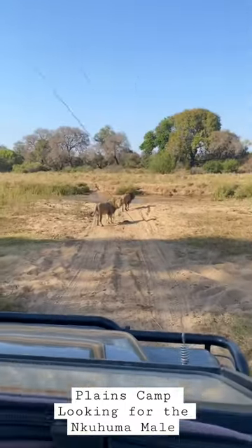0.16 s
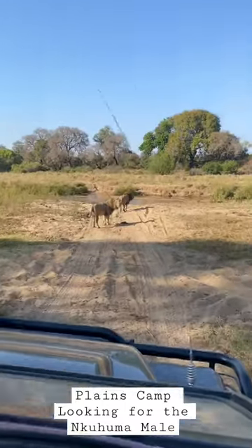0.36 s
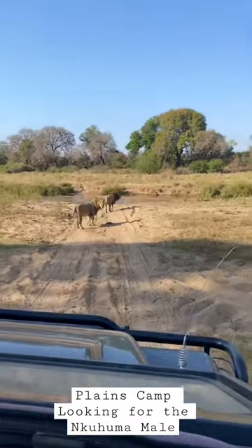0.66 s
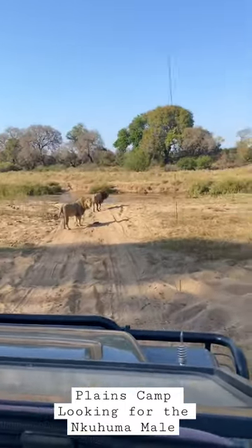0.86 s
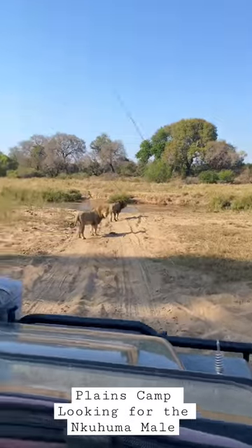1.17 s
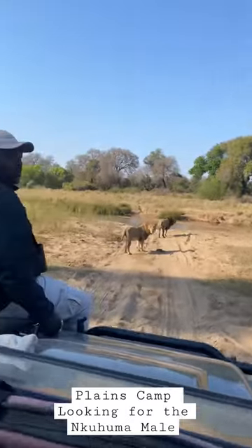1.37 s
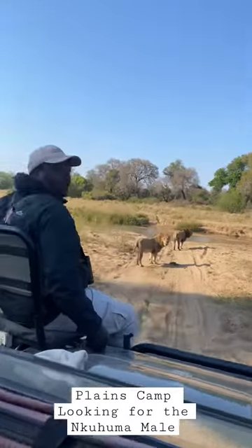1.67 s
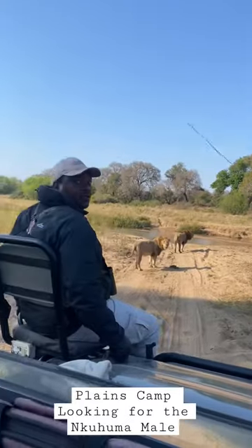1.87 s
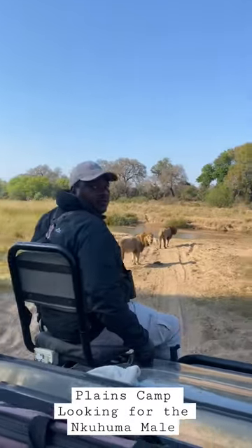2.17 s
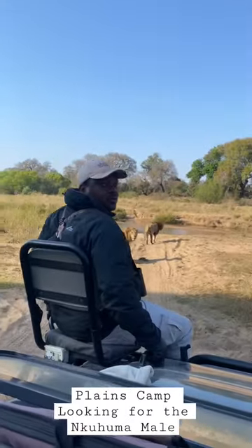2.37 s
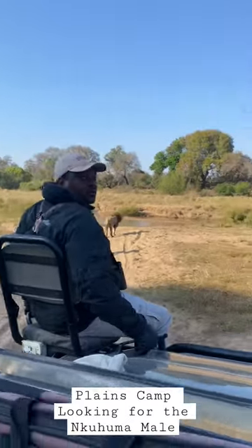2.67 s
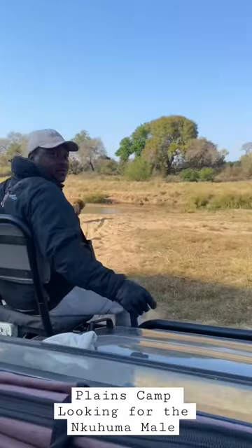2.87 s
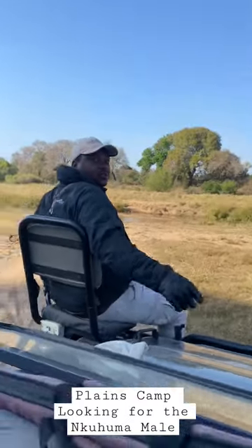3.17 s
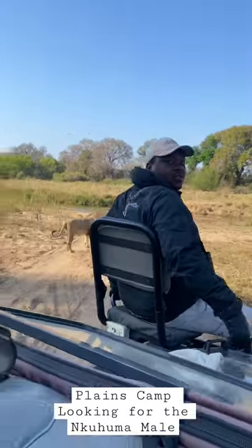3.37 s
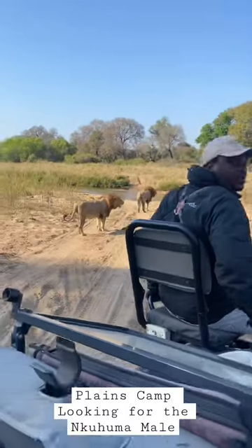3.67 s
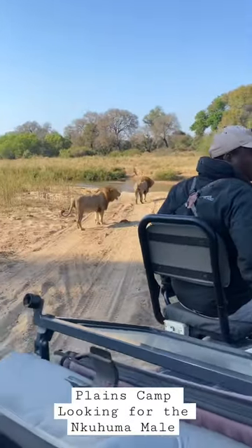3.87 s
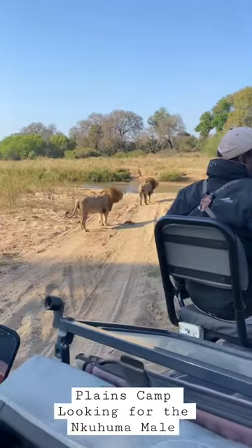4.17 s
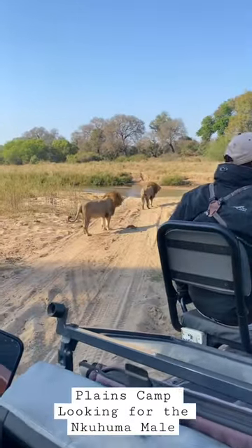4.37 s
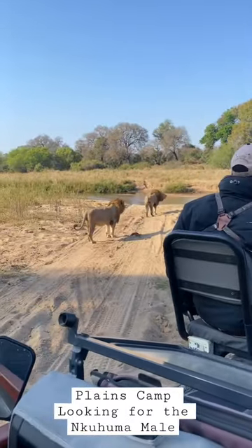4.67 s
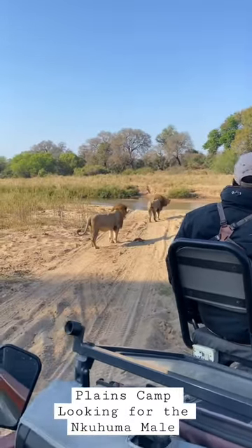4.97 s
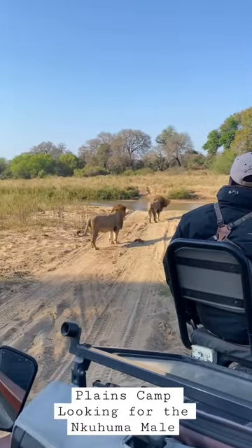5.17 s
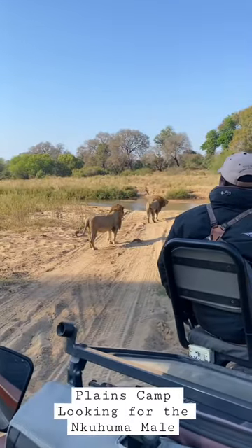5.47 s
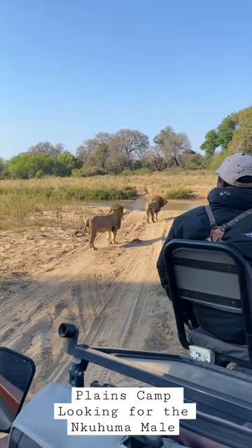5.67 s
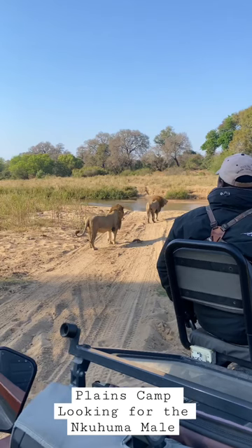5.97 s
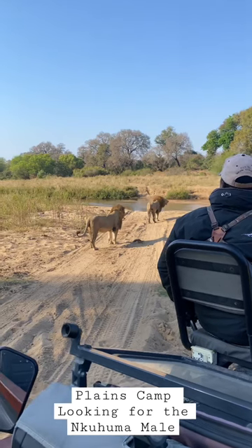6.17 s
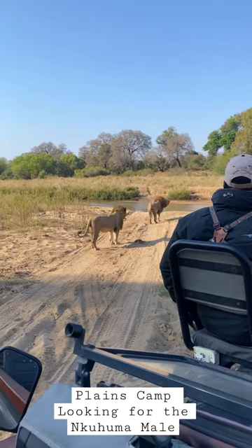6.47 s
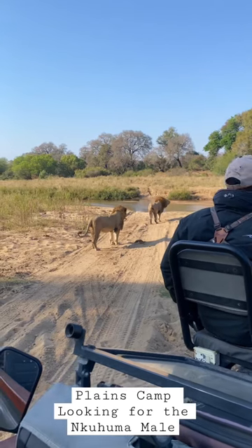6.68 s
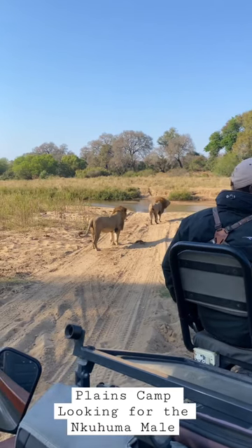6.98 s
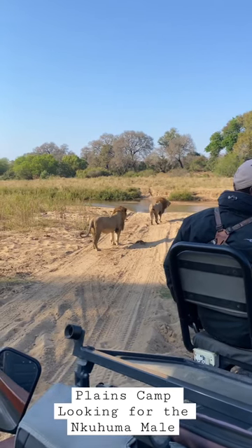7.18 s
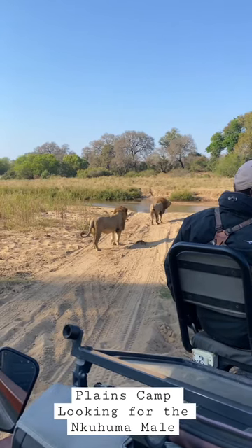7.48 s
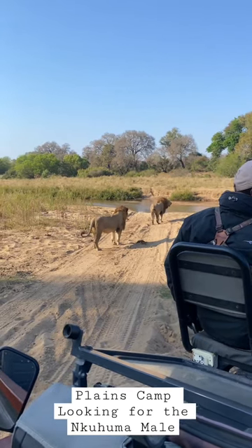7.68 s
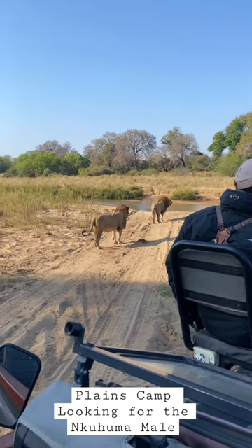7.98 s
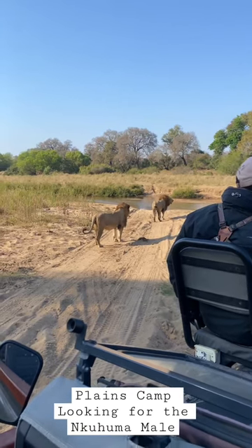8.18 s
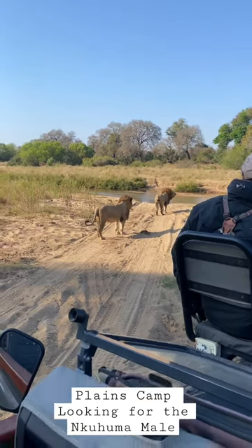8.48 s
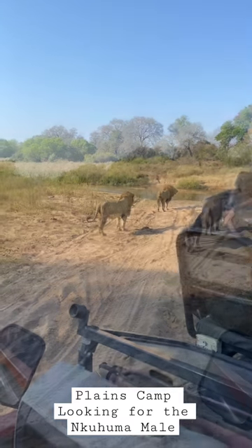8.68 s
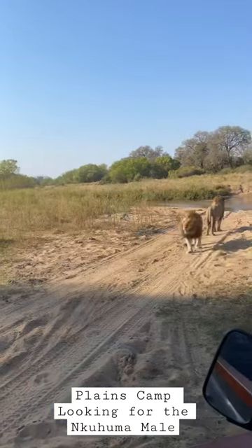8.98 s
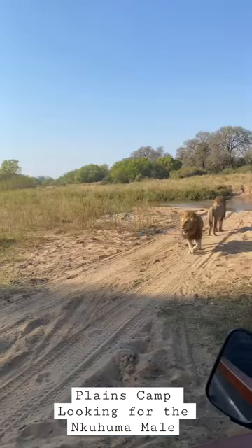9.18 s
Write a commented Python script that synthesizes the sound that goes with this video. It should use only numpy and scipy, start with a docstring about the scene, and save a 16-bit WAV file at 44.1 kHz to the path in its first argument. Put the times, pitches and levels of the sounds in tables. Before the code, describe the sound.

Microphone at the vehicle: low engine throb and quiet hush of open country under powerful, nearly pure low lion moans that rise and sink, breaking into gravelly growl. A companion moans faintly behind. Thin bird chirps slip between calls. Midway there are rattles, tiny squeaks and knocks; after the last short moan the engine speeds up over crunching sand, then vanishes, leaving hush, faint twitters and a few ticks.

```python
"""First a lion's deep moan, close to an idling vehicle in open bush; a second lion joins in, duller and weaker.
Moans come from a buzz and puffs of the vocal folds through moving resonances, torn at times into a rasp.
The microphone is at the vehicle: engine orders through bodywork, filtered-noise tyres and sand, ticking fittings,
dull bumps, scratchy squeaks. It pulls forward, then the sound of engine and tyres is quickly faded out.
Birds, made of gliding sines, chirp now and then and whistle at the end; trees scatter a faint tail."""
import sys
import numpy as np
from scipy import signal
from scipy.fft import rfft, irfft, next_fast_len
from scipy.io import wavfile
from scipy.ndimage import uniform_filter1d, map_coordinates

SR = 44100
rng = np.random.default_rng(int(sys.argv[2]) if len(sys.argv) > 2 else 0)


def master(y):
    """Save y as 16-bit WAV."""
    cut = np.clip(np.atleast_2d(y).T, -1, 1)
    pcm = np.round(cut * 32767)  # scale
    wavfile.write(sys.argv[1], SR, pcm.astype(np.int16))


N = 411453  # samples

# The place. Likeness of left and right: frequency_hz, likeness (-1 to 1)
STEREO_LIKENESS = [(60, 1), (250, 0.97), (640, .91), (1400, 0.78), (3100, 0.45), (6500, 0.4), (11000, -0.5)]
# Hush of the open country, shape only: frequency_hz, density_db (per Hz)
STILL_AIR = [(15, -29.5), (30, -3), (70, -2.5), (170, -7.5), (400, -15.5), (750, -16), (1500, -21),
             (2800, -24), (3800, -24), (5400, -27), (10500, -33.5), (12500, -37), (15000, -43)]
# Decay of the tree line's tail: frequency_hz, t60_s
BUSH_DECAY = [(100, 0.68), (500, 0.3), (2000, 0.19), (10000, 0.11)]
# Share of a roar that the trees throw back: frequency_hz, level_db
SCATTER = [(170, -24), (340, -12)]

# The engine's firing rate: time_s, firings_per_s
FIRING = [(0, 32.5), (2.1, 32.5), (2.45, 36.5), (3.1, 35), (3.9, 32.5), (6.1, 32.3), (6.85, 38.5),
          (7.05, 39.3), (7.7, 48), (8.05, 58), (8.55, 64.5)]
# Engine level before orders and combustion are mixed: time_s, level_db
ENGINE_LOAD = [(0, -39.5), (1.0, -33.5), (1.65, -41), (2.1, -30.5), (2.95, -28), (3.3, -36), (4.4, -41),
               (5.55, -42), (6.45, -41.5), (6.73, -27.5), (7.02, -44.5), (7.5, -38), (8.0, -40), (8.3, -30),
               (8.7, -34)]
# Noise of combustion, shape only: frequency_hz, level_db
COMBUSTION = [(20, -39), (31, -19.5), (43, -3), (62, 1), (90, -3), (135, -3.5), (200, -11), (270, -24),
              (350, -23.5), (600, -37.5), (2000, -67.5)]
# Bodywork resonances, shape only: frequency_hz, level_db
CABIN = [(20, -35), (33, -13.5), (42, -3), (48, 9), (56, -11), (66, 13), (82, -10), (100, -13), (145, -6),
         (215, -19), (270, -10), (330, -30), (500, -41)]
# Resonance of the booming panel, shape only: frequency_hz, level_db
PANEL = [(80, -42.5), (104, -4.5), (118, 1.5), (130, -12), (155, -14), (200, -62)]
# Booms of the panel: start_s, length_s, level_db
BOOMS = [(2.542, 0.78, -62), (3.76, 0.61, -36), (6.647, 0.69, -35), (7.773, 0.48, -29.5),
         (8.284, 0.56, -35)]
PANEL_HUM_DB = -57.5  # always there, booms add to it
FADE_S, FADE_DB_PER_S = 8.75, 307  # engine and tyres are faded out from here, this fast

# Ground under the tyres, before trims and wobbles: time_s, rolling_db, sand_db
GROUND = [(0, -50, -67.5), (1.2, -53, -70), (1.6, -56.5, -81.5), (2.6, -57.5, -63), (3.3, -41.5, -65),
          (3.9, -60.5, -79.5), (4.4, -58.5, -70), (5.7, -65, -69.5), (6.6, -52.5, -62.5), (7.1, -57.5, -67),
          (7.7, -54, -57.5), (8.1, -47, -53.5), (8.4, -48, -58.5), (8.67, -51, -56)]
# Rolling tyres, shape only: frequency_hz, density_db (per Hz)
ROLLING = [(150, -38.5), (220, 2.5), (280, 5.5), (345, -5), (450, -7), (700, -11), (1100, -18),
           (1700, -26.5), (2500, -30), (4000, -67.5)]
# Crackling sand, shape only: frequency_hz, density_db (per Hz)
SAND = [(800, -25), (1500, 0.5), (2500, -4), (3600, -1.5), (5000, -7.5), (6600, -7), (10000, -6),
        (11000, -8), (12200, -23.5), (15000, -44.5)]
JUDDER_HZ, JUDDER_DB = 18, 3  # the rolling throbs

# Ticks before trim and fittings: start_s, level_db, brightness_db_per_octave, t60_s
RATTLES = [(0.083, -36, -7, .09), (0.1442, -49.5, 3.5, 0.066), (2.958, -45.5, 2, 0.14),
           (2.9901, -44.5, 2, 0.2), (3.496, -26, -1.5, .07), (3.811, -33, -3, 0.07),
           (4.195, -44.5, -4.5, 0.14), (4.305, -47.5, 1, 0.09), (5.531, -41.5, -3.5, .05),
           (5.598, -59.5, 10, 0.038), (5.877, -58, -2.5, 0.049), (5.0971, -57, 12.5, 0.07),
           (6.0193, -58, 11, 0.047), (6.2015, -47, 4.5, 0.043), (6.877, -36.5, -0.5, 0.027),
           (7.0773, -45, -5.5, 0.12), (7.8283, -41.5, 3.5, 0.17), (8.088, -36.5, -1.5, .1),
           (8.7685, -44, 5.5, 0.14), (8.9105, -44.5, -7.5, 0.041), (9.126, -48.5, 6, 0.046),
           (9.1907, -46, 0.5, 0.099), (9.296, -35, -8.5, 0.015)]
# Response of the loose fittings: frequency_hz, gain_db
FITTINGS = [(300, -35), (700, 4.5), (1400, 5.5), (2400, 7.5), (4000, 4), (6500, -4), (10000, -9.5),
            (13000, -33)]
# Dull bumps of the chassis, level before onset and mix of partials: start_s, level_db, pitch_hz, t60_s
BUMPS = [(1.941, -16, 573.4, 0.052), (4.037, -27, 335, 0.048), (5.533, -31, 610, 0.047),
         (7.037, -22.5, 495, 0.027), (7.265, -40, 656, 0.049), (8.09, -11.5, 135, 0.12),
         (8.909, -34, 468, 0.015), (9.297, -27, 447, 0.017)]
# Rough squeaks and clinks nearby: start_s, length_s, start_hz, end_hz, peak_db
SQUEAKS = [(2.957, .016, 3466, 3670, -55), (2.978, 0.017, 4590, 4980, -51.5),
           (2.984, 0.012, 5980, 5840, -54.5), (2.989, .018, 3725, 3820, -54),
           (3.005, 0.021, 4180, 3820, -53), (4.082, 0.029, 2126, 2220, -59), (4.2, .048, 1272, 1296, -51),
           (4.191, 0.096, 2740, 2500, -65), (4.273, 0.032, 1516, 1680, -61),
           (4.295, .03, 1986, 2086, -55.5), (4.304, 0.035, 4340, 4440, -58),
           (4.335, 0.055, 4560, 4590, -67)]
SQUEAK_FLUTTER, WHISTLE_FLUTTER = .25, .45  # phase flutter, radians rms

# Leading lion's moans: start_s, end_s, attack_s, release_s, then base levels before effort and opening:
# fundamental_db, throat_db, open_mouth_db, lips_db, sheen_db
MOANS = [(0.005, 1.164, 0.15, .09, -16.5, -36.5, -55, -57, -66.5),
         (1.755, 2.658, 0.059, .08, -15.5, -33.5, -51.5, -60.5, -64),
         (3.111, 3.857, 0.12, 0.047, -14.5, -31, -49.5, -61, -67.5),
         (4.014, 4.16, 0.12, 0.031, -20.5, -34.5, -52.5, -62, -64),
         (4.592, 5.631, 0.095, 0.094, -15, -36.5, -48.5, -58, -64.5),
         (6.385, 6.758, 0.22, 0.13, -12.5, -34.5, -53.5, -57.5, -60)]
# Its vocal folds: time_s, pitch_hz, roughness (0-1, before tears)
VOICE = [ (0.04, 139, .4), (0.12, 149, .35), (0.2, 179, .2), (0.28, 204, .2), (0.4, 219, .6),
         (0.52, 212, .55), (0.6, 183, .4), (0.72, 164, .4), (0.88, 150, .45), (1.03, 150, .6),
         (1.07, 134, .7), (1.14, 127, .8), (1.77, 137, .6), (1.87, 152, .5), (1.95, 172, .4),
         (2.03, 151, .7), (2.31, 165, .7), (2.42, 152, .6), (2.55, 146, .6), (2.63, 131, .7),
         (3.16, 131, .7), (3.28, 135, .7), (3.32, 146, .55), (3.5, 153, .55), (3.68, 142, .5),
         (3.78, 141, .5), (3.85, 131, .7), (4.04, 124, .9), (4.12, 134, .9), (4.19, 119, .9),
         (4.62, 143, .5), (4.67, 148, .06), (4.745, 151, .04), (4.82, 175, .08), (4.87, 180, .02),
         (4.95, 184, .01), (5.05, 179, .03), (5.156, 163, .2), (5.25, 153, .17), (5.37, 143, .3),
         (5.42, 139, .65), (5.51, 137, .8), (5.6, 118, .8), (6.44, 137, .4), (6.53, 146, .28),
         (6.64, 143, .35), (6.7, 126, .6), (6.76, 116, .8)]
# Overtones of the folds of both lions, shape only: multiple, level_db
OVERTONES = [(2, 10), (3, 15), (4, 0.5), (5, 7), (6, 22), (7, 18), (8, 9), (9, -28), (10, 3.5), (12, -21),
             (14, -22), (17, -6.5), (26, -19.5), (33, 1), (36, -11)]
# Throat resonances, shape only: frequency_hz, level_db
THROAT = [(70, -32.5), (115, 5.5), (170, 15), (230, 6), (290, -3.5), (380, 8), (440, 0.5), (500, 0),
          (560, -1.5), (750, -8), (860, -28.5), (1100, -39.5), (1800, -82)]
# Throat of the torn voice, shape only: frequency_hz, level_db
GROWL = [(70, -22.5), (115, 6), (190, 17), (270, 7.5), (370, 7.5), (450, -5.5), (530, -9.5), (620, -4.5),
         (700, -12.5), (800, -5), (900, -24), (1100, -41.5), (1800, -83)]
# Pharynx at rest, shape only: frequency_hz, level_db
PHARYNX = [(300, -53), (480, -15.5), (600, 5.5), (750, -16), (1000, -33.5), (1400, -42.5)]
# Open mouth at rest, shape only: frequency_hz, level_db
MOUTH = [(750, -26.5), (930, -13), (1040, 0.5), (1110, 26), (1190, 16.5), (1300, 14.5), (1420, 3.5),
         (1600, -5.5), (1850, -24), (2200, -44.5), (3200, -52)]
# Lips at rest, shape only: frequency_hz, level_db
LIPS = [(1000, -38), (1250, -15.5), (1450, 7), (1570, -7), (1720, -20.5), (2100, -44.5)]
# Palate at rest, shape only: frequency_hz, level_db
PALATE = [(1300, -36.5), (1650, -9.5), (1850, -4), (2050, -4), (2300, -6.5), (2550, -24), (3400, -47.5)]
# High resonances of an untorn moan, shape only: frequency_hz, level_db
SHEEN = [(1600, -30.5), (2000, -13.5), (2350, -5.5), (2650, 4), (2950, 0.5), (3300, 3.5), (3700, -2.5),
         (4250, 2), (4900, -17), (5500, -10.5), (6000, -4.5), (6700, -6), (9500, -13.5), (11300, -38)]
# Rasp of the torn voice, shape only: frequency_hz, level_db
RASP = [(1400, -35), (1900, -11), (2200, -1), (2550, 6), (2950, 0), (3350, -2), (3750, -2.5), (4300, -4),
        (4900, -16.5), (5500, -7), (6300, -8), (7200, -11), (8000, -10), (10000, -11.5), (11300, -36.5)]
# Jaw and tongue move the resonances: time_s, pharynx_hz, mouth_hz, palate_db
JAW = [(.12, 574, 1164, -62.5), (.35, 620, 1040, -71.5), (.58, 645, 1290, -59), (.78, 554, 1155, -59.5),
       (1.0, 770, 1125, -60), (1.12, 624, 1165, -57), (1.82, 678, 1110, -59.5), (1.98, 653, 1110, -63),
       (2.1, 736, 1127, -57.5), (2.5, 640, 990, -73), (3.2, 780, 1060, -52.5), (3.38, 752, 1086, -60),
       (3.7, 729, 1045, -78), (4.1, 642, 1033, -68), (4.65, 588, 1170, -76.5), (4.87, 556, 1087, -73),
       (5.03, 564, 1070, -62.5), (5.2, 553, 1140, -75), (5.35, 547, 1144, -62), (5.55, 614, 1105, -88),
       (6.55, 588.4, 1130, -80.5)]
# Lips and palate move too: time_s, lips_hz, palate_hz
LIP_SHAPE = [(0.1, 1336, 2030), (1.1, 1434, 2050), (1.9, 1328, 2100), (2.5, 1300, 2160), (3.2, 1330, 2360),
             (3.8, 1340, 2420), (4.1, 1443, 2330), (4.7, 1430, 2410), (5.0, 1346, 1870), (5.5, 1475, 1860),
             (6.6, 1520, 2260)]
# The voice tears: start_s, length_s, fundamental_loss_db, growl_db, open_mouth_db, rasp_db
TEARS = [(0.305, .07, -4.5, -30.5, -34, -49), (0.385, 0.059, 1, -28.5, -38.5, -43),
         (0.456, 0.043, 15, -32, -64, -57), (0.922, 0.041, 5.5, -32.5, -44, -60.5),
         (0.992, 0.062, 2.5, -26.5, -41, -44.5), (1.049, 0.054, 2, -43, -43.5, -47.5),
         (1.942, 0.075, 16.5, -32, -56.5, -76), (2.018, 0.045, 5.5, -23, -35, -46),
         (2.076, 0.059, 15, -23.5, -42.5, -43.5), (2.139, 0.061, 8.5, -29.5, -44, -45.5),
         (2.195, 0.041, 14, -27, -49.5, -47.5), (2.234, 0.067, 13, -28.5, -57, -52.5),
         (3.109, 0.049, 11.5, -38, -55, -67), (3.177, 0.039, -1, -24, -42, -53),
         (3.227, .07, 12, -32.5, -53.5, -50.5), (4.057, .08, 4, -37.5, -75, -61.5),
         (5.053, 0.03, -1, -34, -38, -58.5), (5.384, 0.036, -1, -34, -56.5, -71),
         (5.483, .06, 10, -36, -66, -61), (6.673, 0.06, -1.5, -44, -64, -57.5)]
PHARYNX_REST_HZ, MOUTH_REST_HZ, LIPS_REST_HZ, PALATE_REST_HZ = 600, 1110, 1450, 2050
PHARYNX_DB = -22.5  # relative to the throat
CHEST_HZ, DETUNED_DB = 149.8, 60  # fundamental strongest here; loss an octave away, growing as the square
THROAT_DB_PER_OCTAVE, MOUTH_DB_PER_OCTAVE = 15.5, 3.5  # a higher pitch takes more effort and is brighter
CLOSED_DB, OPENING_S = 5, 1  # the throat starts this much narrower and opens
TIRING_DB_PER_S = 6.5  # the mouth closes as the air runs out
CLEAN_DB = 6  # clean folds close sharply and ring the mouth harder
TORN_ROUGH = .72  # least roughness when fully torn
TEAR_EDGE_S, TEAR_RISE_S = 0.01, 0.03  # it tears and heals this fast; its rasp builds up slower
HEAL_S, GROWL_HEAL_S = 0.079, .045  # release of the rasp, and of the growl that stops sooner
# These scale random wobbles: phase in radians at full roughness or full tear, level in dB
JITTER, TORN_JITTER, LURCH_DB, GRAVEL_DB = .42, .22, 4.2, 2.6
RASP_PATCHY_DB, MOUTH_PATCHY_DB, GROWL_PATCHY_DB = 2, 2, 4  # rms of patches in the colour
ALTERNATE_DB = 3.5  # the growl beats harder on every other cycle

# Second lion, one table a call: time_s, pitch_hz, fundamental_db, throat_db
ANSWERS = [
    [(0.27, 175.3, -42, -44), (0.31, 175.7, -23.5, -29), (0.36, 154.6, -13.5, -46),
     (0.41, 140.7, -22.5, -27), (0.48, 119.2, -22, -41.5), (0.53, 111.6, -41, -54)],
    [(0.535, 227.5, -37.5, -28.5), (0.59, 214.7, -33, -26.5), (0.68, 204.5, -58, -36.5),
     (0.9, 175.4, -41, -34.5), (0.96, 170.7, -31.5, -45)],
    [(1.9, 187.7, -55.5, -44), (1.98, 215.3, -35.5, -32), (2.12, 228, -37.5, -30.5),
     (2.3, 208.2, -42.5, -33), (2.42, 185.6, -50, -44), (2.5, 175, -56.5, -51)],
    [(6.27, 135.3, -49.5, -62.5), (6.34, 147, -37, -45.5), (6.42, 172.1, -32.5, -37.5),
     (6.58, 211.3, -47.5, -38), (6.83, 214.6, -33, -44.5), (6.97, 181.7, -33.5, -50.5),
     (7.03, 163, -59, -63)],
]
# Its duller throat, shape only: frequency_hz, level_db
SECOND_THROAT = [(100, -18), (200, 5.5), (330, 1), (440, 0.5), (560, -15), (680, -14.5), (900, -25.5),
                 (1300, -31), (1700, -37), (2600, -67)]

# One bird's chirp rises, levels off, hooks up: start_s, length_s, start_hz, level_hz, end_hz, peak_db
CHIRPS = [(1.441, 0.056, 4655, 4960, 5730, -58.5), (1.742, 0.056, 4390, 4900, 5560, -63.5),
          (2.003, 0.058, 4800, 4900, 5280, -61), (2.646, 0.081, 4950, 4980, 5280, -61.5),
          (2.894, 0.071, 4820, 5080, 5400, -59), (3.134, 0.046, 4820, 5040, 5200, -60),
          (7.115, 0.04, 4400, 4780, 5430, -58)]
CHIRP_RISE = 0.0053  # the level part climbs from this share below its pitch to as much above
# Another bird's arched notes: start_s, peak_db
ARCHES = [(8.84, -65), (9.02, -68), (9.2, -65)]
# Length; first note's pitch at start, middle and end; share by which each next note is lower
ARCH_S, ARCH_HZ, ARCH_SINK = 0.13, (3880, 4200, 3810), 0.038
# Stray whistles: start_s, length_s, start_hz, middle_hz, end_hz, peak_db
WHISTLES = [(8.855, 0.048, 2150, 2080, 1900, -67), (8.883, 0.05, 1584, 1400, 1310, -59.5),
            (8.922, 0.034, 3200, 3140, 2700, -65), (8.945, 0.22, 1300, 1365, 1400, -66),
            (8.977, 0.051, 3420, 3370, 3220, -73), (8.978, 0.037, 2686, 2487, 1885, -63),
            (9.019, 0.038, 1470, 1830, 1945, -58), (9.068, 0.046, 3390, 3150, 2970, -66),
            (9.106, 0.099, 2126, 1840, 1798, -63.5), (9.073, 0.095, 2605, 2630, 2730, -66),
            (9.116, 0.047, 2720, 2800, 3180, -63), (9.142, 0.029, 4580, 3610, 3320, -54),
            (9.175, 0.2, 3195, 3220, 3460, -69), (9.211, 0.15, 2130, 2346, 2476, -61),
            (9.206, 0.18, 1700, 2020, 2180, -63)]

LIMIT_DB, TOP_HZ = -14, 15800  # limiter's threshold and the band limit


def amp(db):
    """Decibels to gain."""
    return np.exp(np.asarray(db) * (np.log(10) / 20))


def unit(x):
    """Scaled to rms 1."""
    return x / np.sqrt(np.mean(x ** 2) + 1e-20)


def steady(x):
    """Scaled to rms 1 over every 50 ms."""
    return x / np.sqrt(np.abs(uniform_filter1d(x ** 2, size=2200)) + 1e-12)


def along(points, hz):
    """(Hz, value) points read on a log axis."""
    f, v = np.transpose(points)
    return np.interp(np.log(hz + 1), np.log(f + 1), v)


def curves(rows):
    """One value per sample for each column after the time."""
    s, *cols = np.transpose(rows)
    return [np.interp(np.arange(N) / SR, s, c) for c in cols]


def wobble(rate):
    """A smooth random curve, rate knots a second."""
    at = np.linspace(0, N * rate / SR, N // 32)
    coarse = map_coordinates(rng.standard_normal(int(N * rate / SR) + 4), [at])
    return np.interp(np.arange(N), np.linspace(0, N, len(at)), coarse)


def filtered(x, response):
    """x times a response of frequency."""
    m = next_fast_len(N + SR // 10, real=True)
    return irfft(rfft(x, m) * response(np.fft.rfftfreq(m, 1 / SR)), m)[..., :N]


def coloured(x, spectrum):
    """x through a (Hz, dB) spectrum."""
    return filtered(x, lambda hz: amp(along(spectrum, hz)))


def spread(pair):
    """Two unrelated sounds to left and right: alike in the bass, apart in the treble."""
    def mid_and_side(hz):
        turn = np.arccos(np.clip(along(STEREO_LIKENESS, hz), -1, 1)) / 2
        return np.array([np.cos(turn), np.sin(turn)])

    mid, side = filtered(pair, mid_and_side)
    return np.array([mid + side, mid - side])


def rush(spectrum):
    """Stereo noise of rms 1."""
    return unit(coloured(spread(rng.standard_normal((2, N))), spectrum))


def swell(start, end, attack, release):
    """A smooth attack, hold and release between 0 and 1."""
    out = np.zeros(N)
    i = np.arange(max(int(start * SR), 0), min(int(end * SR), N))
    u = np.clip(np.minimum((i / SR - start) / attack, (end - i / SR) / release), 0, 1)
    out[i] = u * u * (3 - 2 * u)
    return out


def fade():
    """Gain of engine and tyres: full until the quick fade-out."""
    return amp(-FADE_DB_PER_S * np.maximum(np.arange(N) / SR - FADE_S, 0))


def engine():
    """Orders of the firing rate sweep through the bodywork; a panel booms with those near its resonance."""
    rate, = curves(FIRING)
    level_db, = curves(ENGINE_LOAD)
    phase = 2 * np.pi * np.cumsum(rate * (1 + 0.00805 * wobble(8.2))) / SR
    orders = 0
    for k in range(1, 11):
        orders = orders + amp(4.83 * wobble(11)) * np.sin(k * phase + rng.uniform(0, 2 * np.pi))
    # noise pulses once a firing
    firing_noise = spread(rng.standard_normal((2, N))) * (0.64 + np.cos(phase))
    combustion = unit(coloured(firing_noise, COMBUSTION))
    body = amp(level_db + 1.5 * wobble(7)) * (.8 * steady(coloured(orders, CABIN)) + .55 * combustion)
    boom = amp(PANEL_HUM_DB)
    for s, length, db in BOOMS:
        boom = boom + amp(db) * swell(s, s + length, length / 2, length / 2)
    return fade() * (body + boom * steady(coloured(orders, PANEL)))


def sand_grains():
    """Sand crackle of rms 1: noise whose level flickers at random."""
    flickering = rng.standard_normal((2, N)) * amp(1.8 * wobble(260))
    return unit(coloured(spread(flickering), SAND))


def tyres(grains):
    """Tyres roll with a regular judder and crush the sand under them."""
    rolling_db, sand_db = curves(GROUND)
    sand = amp(sand_db + 1.2 * wobble(16) + 1.3 * wobble(70)) * grains
    judder_db = JUDDER_DB * np.sin(2 * np.pi * JUDDER_HZ * np.arange(N) / SR)
    rolling = amp(rolling_db + 3.5 + judder_db + 0.85 * wobble(21)) * rush(ROLLING)
    return fade() * (sand + rolling)


def open_country(grains):
    """Constant hush of the place, with a trace of the same crackle."""
    return amp(-60.0) * rush(STILL_AIR) + amp(-74.5) * grains


def folds(pitch_hz, rough, jitter, flutter_db):
    """Phase and sound of vocal folds: a buzz that roughness turns into puffs of turbulence, one a cycle."""
    phase = 2 * np.pi * np.cumsum(uniform_filter1d(pitch_hz, size=900)) / SR
    cycle = np.linspace(0, 2 * np.pi, 2048)
    pulse = unit(sum(amp(along(OVERTONES, k)) * np.cos(k * cycle) for k in range(2, 37)))
    buzz = np.interp((phase + jitter * rough * wobble(90)) % (2 * np.pi), cycle, pulse)
    # the level of the folds flutters at random
    uneven = amp(flutter_db * wobble(60) + 0.42 * rough * np.cos(phase / 2))
    opening = 1.5 + np.cos(phase)
    puffs = unit(rng.standard_normal((2, N)) * opening * uneven)
    source = np.sqrt(1 - rough) * buzz * uneven ** rough + np.sqrt(rough) * 2.3 * spread(puffs)
    return phase, source


def tract(x, spectrum, shift=1, patchy_db=0):
    """x through a resonance that slides by the factor shift, in short patches of random gain."""
    hz, t, z = signal.stft(x.astype(np.float32), SR, nperseg=512)
    shift = np.broadcast_to(shift, N)[np.minimum((t * SR).astype(int), N - 1)]
    patches = uniform_filter1d(rng.standard_normal(z.shape[1:]), size=4, axis=0)
    patches = unit(uniform_filter1d(patches, size=4, axis=1))
    gain = amp(along(spectrum, hz[:, None] / shift) + patchy_db * patches)
    return signal.istft(z * gain.astype(np.float32), SR, nperseg=512)[1][:, :N]


def moans():
    """Gains of fundamental, throat, mouth, lips and sheen; roots make overtones rise sooner and sink later."""
    t, gains = np.arange(N) / SR, np.zeros((5, N))
    for start, end, attack, release, *levels_db in MOANS:
        span = slice(int(start * SR), int(end * SR))
        age = t[span] - start
        push = swell(start, end, attack, release)[span]
        narrow_db = CLOSED_DB * np.exp(-age / OPENING_S)
        throat = np.sqrt(push) * amp(-narrow_db)
        mouth = np.sqrt(push) * amp(-TIRING_DB_PER_S * age - narrow_db / 2)
        gains[:, span] += amp(levels_db)[:, None] * np.array([push, throat, mouth, np.cbrt(push), mouth])
    return gains


def tears():
    """How torn the voice is (0-1), the fundamental's loss in dB, and added gains of growl, mouth and rasp."""
    def envelopes(attack, release, extra):
        return np.array([swell(s, s + length + extra, attack, release) for s, length, *_ in TEARS])

    _, _, loss_db, growl_db, mouth_db, rasp_db = np.transpose(TEARS)
    shapes = envelopes(TEAR_EDGE_S, TEAR_EDGE_S, 0)
    bursts = envelopes(TEAR_EDGE_S, GROWL_HEAL_S, GROWL_HEAL_S / 2) ** 2
    lingering = envelopes(TEAR_RISE_S, HEAL_S, HEAL_S / 2) ** 2
    powers = [amp(growl_db) ** 2 @ bursts, amp(mouth_db) ** 2 @ lingering, amp(rasp_db) ** 2 @ lingering]
    return np.minimum(shapes.sum(axis=0), 1), loss_db @ shapes, np.sqrt(powers)


def leading_lion():
    """A nearly pure deep fundamental; throat and mouth brighten with pitch, and tears add growl and rasp."""
    pitch_hz, rough = curves(VOICE)
    pharynx_hz, mouth_hz, palate_db = curves(JAW)
    lips_hz, palate_hz = curves(LIP_SHAPE)
    chest, throat, mouth, lips, sheen = moans()
    torn, loss_db, (growl, torn_mouth, rasp) = tears()
    rough = np.clip(np.maximum(rough, TORN_ROUGH * torn), 0, 1)
    phase, source = folds(pitch_hz, rough, JITTER, flutter_db=1.3)
    octaves = np.log2(pitch_hz / CHEST_HZ)
    # torn folds make the fundamental lurch
    lurch_db = (0.29 * rough + LURCH_DB * torn) * wobble(40)
    chest = chest * amp(-DETUNED_DB * octaves ** 2 - loss_db + lurch_db)
    throat = throat * amp(THROAT_DB_PER_OCTAVE * octaves) * (1 - torn / 2)
    growl = growl * amp(GRAVEL_DB * wobble(55) + ALTERNATE_DB * np.cos(phase / 2))
    effort = amp(MOUTH_DB_PER_OCTAVE * octaves + CLEAN_DB * (1 - rough) ** 4)
    mouth = np.hypot(mouth * effort, torn_mouth)
    palate = amp(palate_db) * sum(swell(*times) for *times, _, _, _, _, _ in MOANS)
    return (chest * np.sqrt(2) * np.sin(phase + TORN_JITTER * torn * wobble(80))
            + throat * steady(coloured(source, THROAT))
            + growl * steady(tract(source, GROWL, patchy_db=GROWL_PATCHY_DB))
            + throat * amp(PHARYNX_DB) * steady(tract(source, PHARYNX, pharynx_hz / PHARYNX_REST_HZ))
            + mouth * steady(tract(source, MOUTH, mouth_hz / MOUTH_REST_HZ, MOUTH_PATCHY_DB))
            + lips * steady(tract(source, LIPS, lips_hz / LIPS_REST_HZ))
            + palate * steady(tract(source, PALATE, palate_hz / PALATE_REST_HZ))
            + sheen * effort * steady(coloured(source, SHEEN))
            + rasp * steady(tract(source, RASP, patchy_db=RASP_PATCHY_DB)))


def bush(x):
    """The tree line scatters a faint tail, 16 ms late, whose treble dies first."""
    hz, t, z = signal.stft(rng.standard_normal((2, SR // 2)), SR, nperseg=256)
    decay = amp(-60 * t / along(BUSH_DECAY, hz)[:, None])
    tail = signal.istft(z * decay, SR, nperseg=256)[1]
    tail = tail / np.linalg.norm(tail[0])
    delayed = np.pad(x, (700, 0))
    return spread(signal.fftconvolve(delayed[None], tail, axes=1)[:, :N])


def rattles():
    """Loose fittings tick: decaying bursts of noise through their resonances."""
    out, t = np.zeros((2, N + SR)), np.arange(SR // 3) / SR
    octaves = np.log2(np.maximum(np.fft.rfftfreq(len(t), 1 / SR), 400) / 2000)
    for s, db, bright_db, t60 in RATTLES:
        tick = irfft(rfft(rng.standard_normal((2, len(t)))) * amp(bright_db * octaves), len(t))
        out[:, round(s * SR):][:, :len(t)] += amp(db - 5.5) * tick * amp(-60 * t / t60)
    return coloured(spread(out[:, :N]), FITTINGS)


def bumps():
    """The chassis answers bumps with a dull ring of three decaying partials."""
    out, t = np.zeros(N), np.arange(SR // 3) / SR
    for s, db, hz, t60 in BUMPS:
        partials = [(.72, 0.29), (1, 0.95), (1.23, .35)]  # pitch ratio, size
        ring = sum(np.sin(2 * np.pi * hz * ratio * t) * size for ratio, size in partials)
        thud = amp(db - 60 * t / t60) * (1 - np.exp(-t / 0.0048)) * ring
        out += np.pad(thud, (round(s * SR), N))[:N]
    return out


def phrases(tables):
    """A soft gate that is open during the calls, then their curves."""
    t = np.arange(N) / SR
    gate = sum(1. * (t > rows[0][0]) * (t < rows[-1][0]) for rows in tables)
    return [uniform_filter1d(gate, size=600)] + curves([row for rows in tables for row in rows])


def second_lion():
    """Its companion's weaker moans: a fundamental and folds through one duller throat."""
    gate, pitch_hz, chest_db, throat_db = phrases(ANSWERS)
    phase, source = folds(pitch_hz, rough=.27, jitter=1, flutter_db=1)
    chest = amp(chest_db) * np.sqrt(2) * np.sin(phase)
    throat = amp(throat_db) * steady(coloured(source, SECOND_THROAT))
    return gate * (chest + throat)


def note(s, length, pitches_hz, db, flutter_rad=0):
    """A whistle gliding smoothly through evenly spaced pitches, its phase fluttering if asked."""
    u = np.linspace(0, 1, int(length * SR))
    knots = np.linspace(0, 1, len(pitches_hz))
    hz = np.polyval(np.polyfit(knots, pitches_hz, len(pitches_hz) - 1), u)
    flutter = flutter_rad * unit(uniform_filter1d(rng.standard_normal(SR // 2), size=90))[:len(u)]
    tone = amp(db) * np.sqrt(np.abs(np.sin(np.pi * u))) * np.sin(2 * np.pi * np.cumsum(hz) / SR + flutter)
    return np.pad(tone, (round(s * SR), N))[:N]


def birds():
    """Two birds repeat their notes among stray whistles, all gliding sines."""
    song = np.zeros(N)
    for s, length, start_hz, hz, end_hz, db in CHIRPS:
        song += note(s, length, [start_hz, hz * (1 - CHIRP_RISE), hz * (1 + CHIRP_RISE), end_hz], db)
    for k, (s, db) in enumerate(ARCHES):
        song += note(s, ARCH_S, np.array(ARCH_HZ) * (1 - ARCH_SINK) ** k, db)
    for s, length, *glide_hz, db in WHISTLES:
        song += note(s, length, glide_hz, db, WHISTLE_FLUTTER)
    return song


def squeaks():
    """Brief scratchy tones close to the microphone: short glides with a fluttering phase."""
    return sum(note(s, length, glide_hz, db, SQUEAK_FLUTTER) for s, length, *glide_hz, db in SQUEAKS)


def scene():
    """Animals out in the open, the vehicle right at the microphone."""
    lions = leading_lion() + second_lion()
    song = birds()
    scattered = bush(coloured(lions.mean(axis=0), SCATTER) + amp(-6.5) * song)
    grains = sand_grains()
    vehicle = engine() + tyres(grains) + rattles() + bumps() + squeaks()
    return lions + song + scattered + vehicle + open_country(grains)


def record(dry):
    """The phone's limiter holds the loudest moans level and rounds off stray peaks, below a band limit."""
    loudness = np.sqrt(np.abs(uniform_filter1d(dry.mean(axis=0) ** 2, size=900)))
    gain = uniform_filter1d(np.minimum(1, amp(LIMIT_DB) / (loudness + 1e-9)), size=500)
    held = dry * gain
    rounded = held / (1 + np.abs(held / .45) ** 8) ** (1 / 8)
    return filtered(rounded, lambda hz: hz < TOP_HZ)


dry = scene()
out = record(dry)
master(out)
```